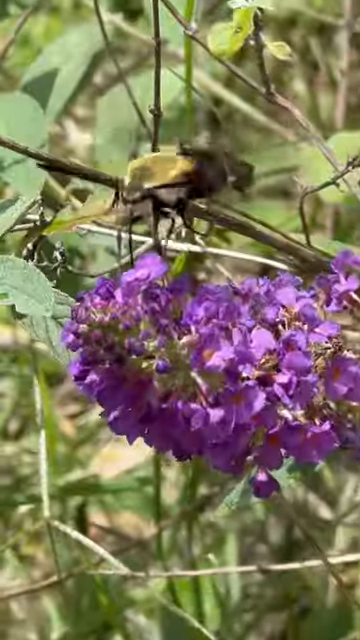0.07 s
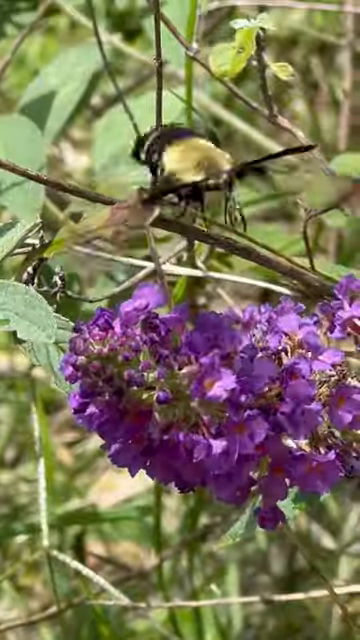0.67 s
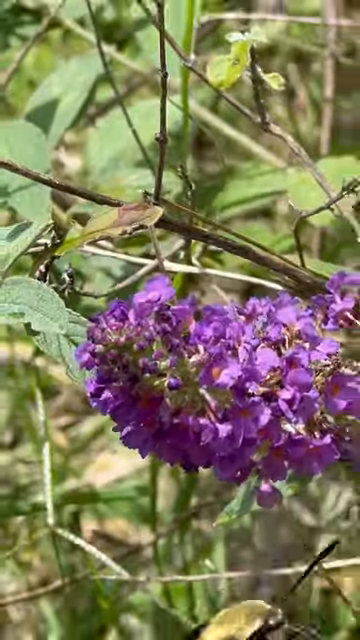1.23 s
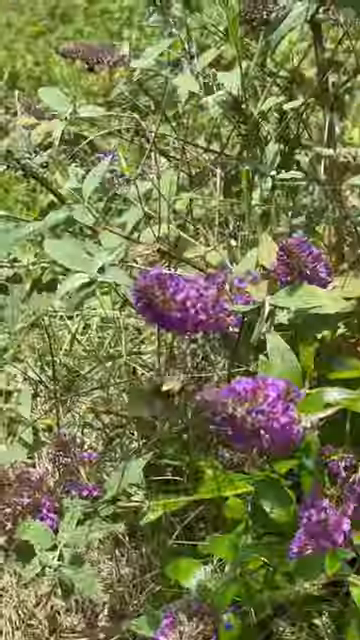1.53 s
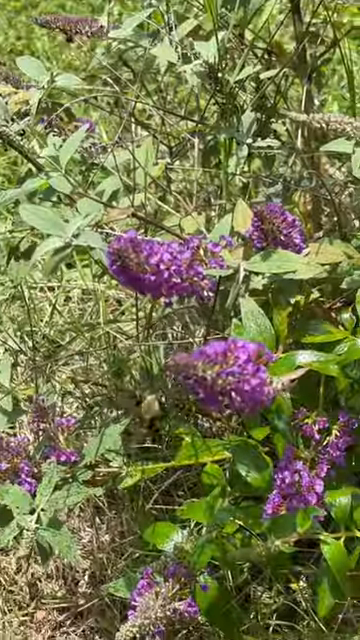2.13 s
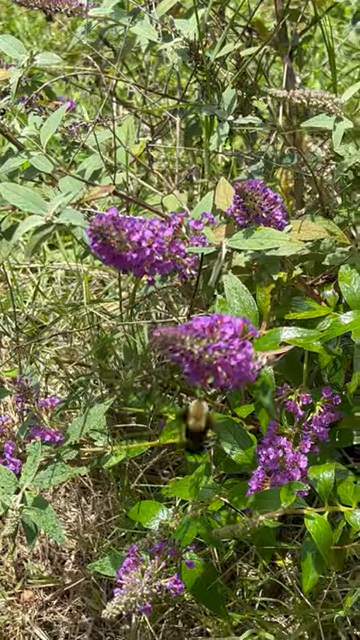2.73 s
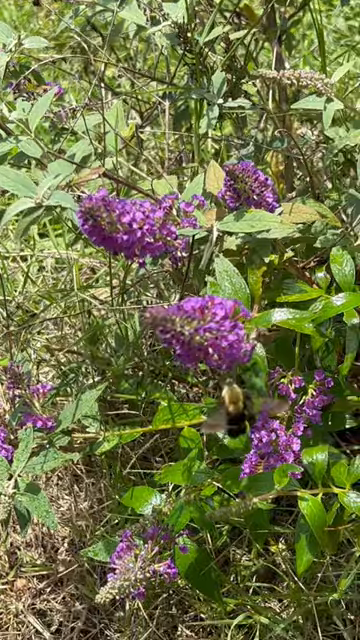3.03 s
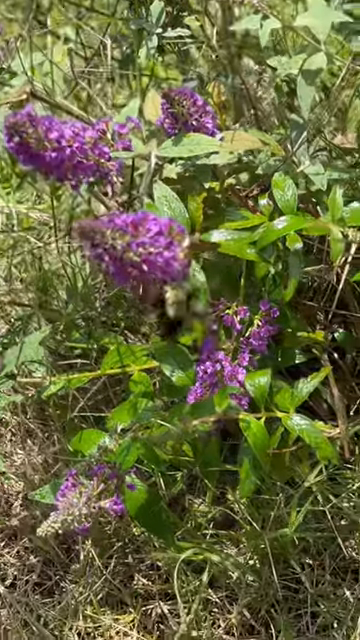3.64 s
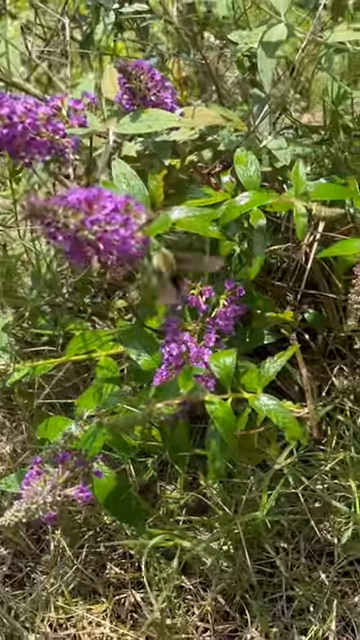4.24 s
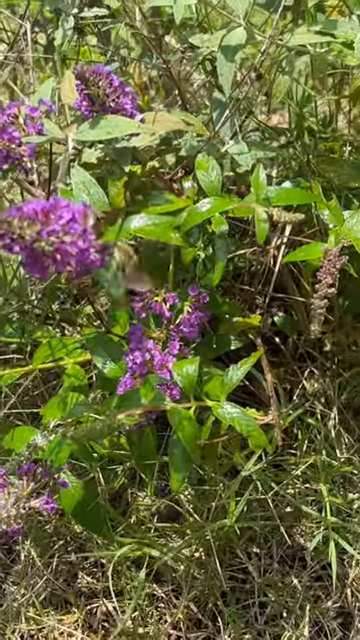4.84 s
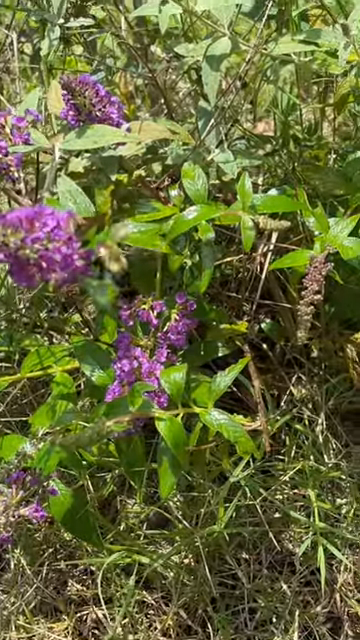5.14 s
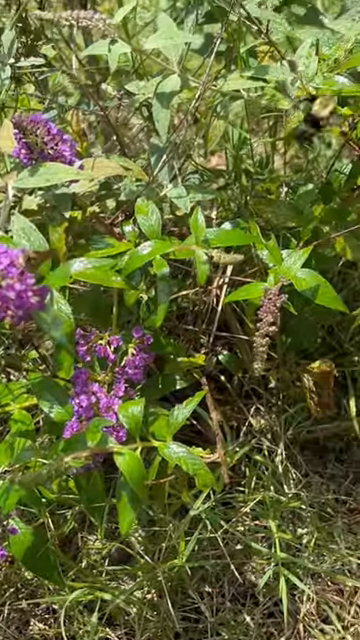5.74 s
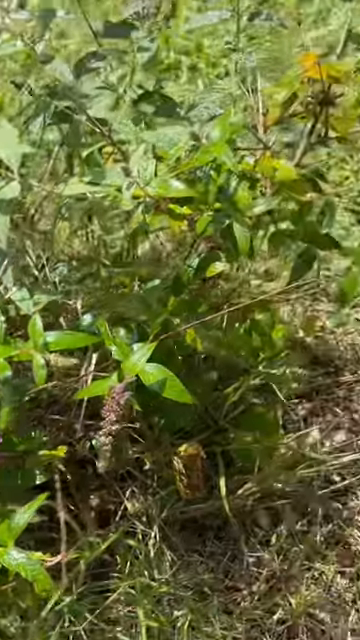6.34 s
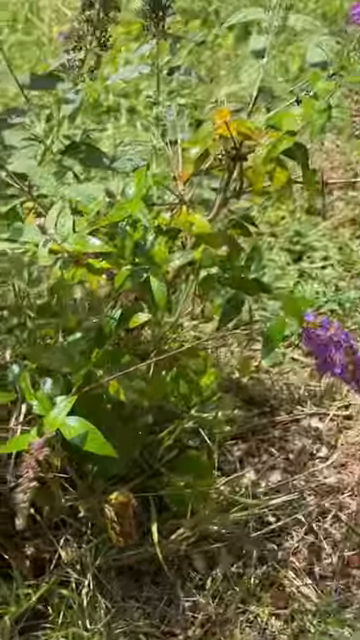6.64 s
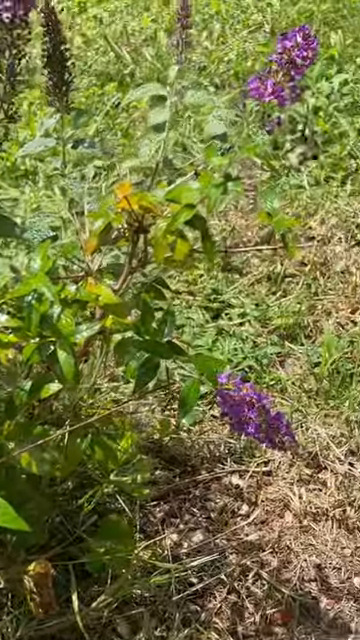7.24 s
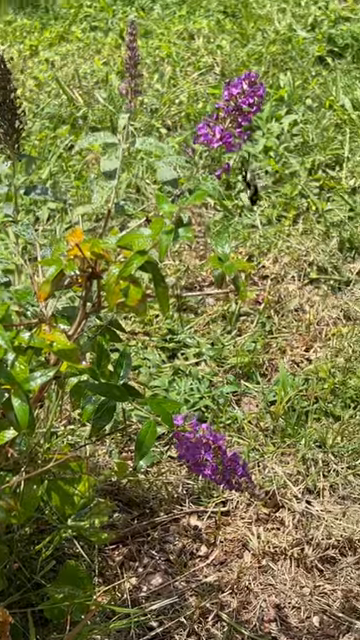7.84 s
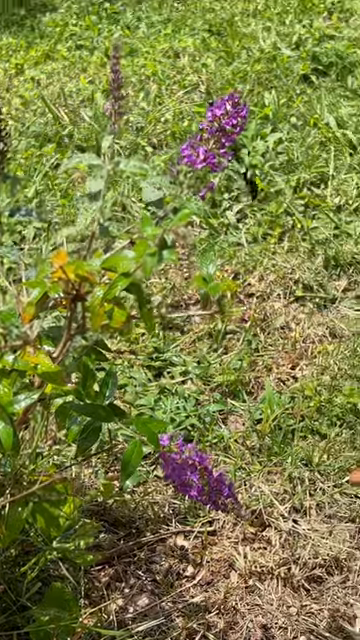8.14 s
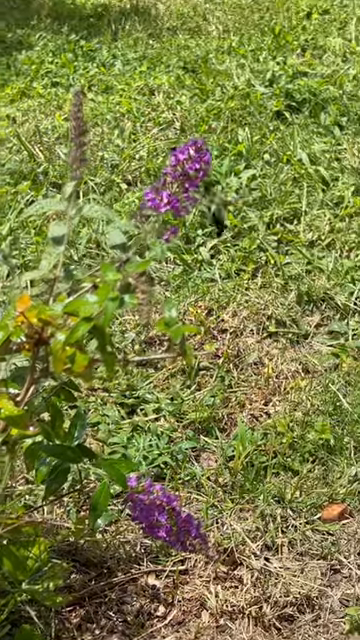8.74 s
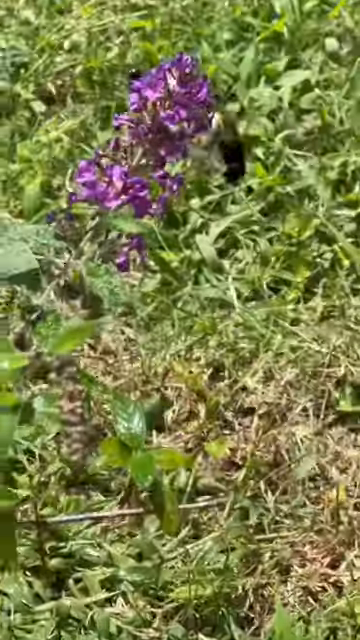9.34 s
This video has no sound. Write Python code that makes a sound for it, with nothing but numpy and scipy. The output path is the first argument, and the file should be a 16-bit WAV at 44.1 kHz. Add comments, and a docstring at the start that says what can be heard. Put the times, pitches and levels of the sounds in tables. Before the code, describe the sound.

A quiet outdoor garden ambience. From start to finish, one close cricket gives short, high, trilling chirps, three or four a second, slightly louder in the first 1.5 seconds. Two fainter crickets chirp out of step with it, one a little lower in pitch and one a little higher. Behind them is a steady, thin, high sizzle of insects. A low rumble of distant traffic continues throughout. A far mower drones at the start and gradually recedes, while a smoother distant engine comes up around 5 seconds and is strongest at about 6 to 7.5 seconds. Dry stalks give small, brief clicks around 1 second, at 1.7 seconds, twice near 3.5 seconds and once more sharply at 8 seconds. Leaves stir almost inaudibly. The chirping carries on to the end at about 9.5 seconds.

```python
"""A sunny garden. One cricket chirps close by and two answer from farther off; each chirp is a few
evenly spaced strokes of a scraper over a file, which set the wing ringing. Behind them a chorus of
meadow insects merges into a steady high sizzle. Two far engines, likely mowers, drone in harmonics
of their firing over a faint hum and the rumble and tyre wash of distant traffic. Puffs of air stir
the leaves, and a few dry stalks crack and ring with a tick."""
import sys
import numpy as np
from scipy import signal
from scipy.fft import rfft, irfft, next_fast_len
from scipy.io import wavfile
from scipy.ndimage import uniform_filter1d

SR = 44100
rng = np.random.default_rng(int(sys.argv[2]) if len(sys.argv) > 2 else 0)


def store_pcm(level_fs):
    """Save levels as 16-bit WAV."""
    pcm = np.round(np.clip(level_fs, -1, 1) * 32767).astype(np.int16)
    wavfile.write(sys.argv[1], SR, np.atleast_2d(pcm).T)


N = 418950
TIME = np.arange(N) / SR

# The stereo sound field. Each row: frequency in Hz, left-right coherence, left minus right in dB.
STEREO_FIELD = [(62, .9995, 0.5), (115, .998, 0.5), (177, 1, 2), (290, 0.97, 3.5), (496, 0.77, 2),
                (800, .62, 0), (1240, 0.63, -2.5), (1680, 1, -1), (4000, 0.98, 1), (8700, 0.99, 0)]


def from_db(db):
    """Amplitude ratio: a factor of ten for every 20 dB."""
    return 10 ** (np.asarray(db) / 20)


def unit_rms(x):
    """Normalisation to unit mean power."""
    return x / np.sqrt(np.mean(x ** 2) + 1e-20)


def in_time(rows):
    """Linear interpolation of each column over time."""
    times, *columns = np.transpose(rows)
    return [np.interp(TIME, times, column) for column in columns]


def at_hz(rows, hz):
    """Interpolation of each column on a logarithmic frequency axis."""
    frequencies, *columns = np.transpose(rows)
    return [np.interp(np.log(hz), np.log(frequencies), column) for column in columns]


def drift(rate_hz):
    """Slow random fluctuation: low-passed noise of unit rms."""
    step, run_in = 40, 2000
    pole = np.exp(-2 * np.pi * rate_hz * step / SR)
    white = rng.standard_normal(N // step + run_in + 2)
    slow = signal.lfilter([1], [1, -2 * pole, pole * pole], white)[run_in:]
    return np.interp(np.arange(N) / step, np.arange(len(slow)), unit_rms(slow))


def band(x, low_hz, high_hz, order=2):
    """Maximally flat band-pass filtering."""
    sections = signal.butter(order, [low_hz, min(high_hz, .45 * SR)], "band", fs=SR, output="sos")
    return signal.sosfilt(sections, x)


def pan(db):
    """Direction by level difference: gains that put left db above right."""
    return from_db(np.array([[db], [-db]]) / 2)


def banded_noise(spectrum, edges_hz, flicker_db):
    """Partly coherent stereo noise of unit rms; each band has its own level, flicker and width."""
    out, white = 0, rng.standard_normal((2, 2, N))
    for k, (low, high) in enumerate(zip(edges_hz, edges_hz[1:])):
        mid, side = band(white[k % 2], low, high, order=3)
        centre_hz = np.sqrt(low * high)
        coherence, lean_db = at_hz(STEREO_FIELD, centre_hz)
        gain = from_db(at_hz(spectrum, centre_hz)[0] + flicker_db * drift(21))
        pair = np.sqrt(1 + coherence) * mid + np.sqrt(1 - coherence) * side * [[1], [-1]]
        out = out + gain * pan(lean_db) * pair
    return unit_rms(out)


def traffic():
    """Broadband noise: distant vehicles add up to a low rumble and a soft wash of tyres."""
    # Spectra of rumble and wash. Each row: frequency in Hz, relative spectral density in dB.
    rumble_spectrum = [(20, -31.5), (32, -23), (45, -6), (70, 1), (120, 0), (170, 0.5), (225, -8),
                       (300, -10.5), (400, -20), (600, -36.5), (1000, -47.5)]
    wash_spectrum = [(300, 0.5), (450, -1.5), (550, -4), (660, -3.5), (900, 2.5), (1100, -2.5),
                     (1500, -8.5), (2000, -16), (2800, -24), (4000, -32.5), (5200, -41.5), (7000, -38)]
    # Each row: time in seconds, rumble level in dB, wash level in dB.
    levels = [(0, -50, -61.5), (2, -49, -62), (4.3, -52, -63), (6.3, -49, -62), (7.5, -50.5, -61),
              (9.5, -50.5, -60.5)]
    rumble_db, wash_db = in_time(levels)
    rumble = banded_noise(rumble_spectrum, np.geomspace(18, 1100, 16), flicker_db=1.0)
    wash = banded_noise(wash_spectrum, np.geomspace(280, 7000, 18), flicker_db=.6)
    return from_db(rumble_db) * rumble + from_db(wash_db) * wash


def hum():
    """Narrow-band noise is heard as a wavering pitch: a far hum that holds its level, then fades."""
    hold_s, fade_db_per_s = 2.85, 2.5
    level_db = -69.5 - fade_db_per_s * np.maximum(TIME - hold_s, 0)
    return from_db(level_db) * unit_rms(band(rng.standard_normal(N), 526.5, 554, order=1)) * pan(2.4)


def drone(cycle_hz, orders, levels, registers_hz, fading_db, flutter_db, throb_db, wobble_rad):
    """A modulated harmonic series: uneven firing makes all orders throb, moving air makes each waver."""
    out, cycles, register_db = 0, np.cumsum(cycle_hz) / SR, np.array(in_time(levels))
    for multiple, db in orders:
        hz = multiple * np.mean(cycle_hz)
        # An order follows the levels of the registers nearest to it.
        shares = np.array([np.interp(hz, registers_hz, own) for own in np.eye(len(registers_hz))])
        gain = from_db(db + shares @ register_db + fading_db * drift(1.18) + flutter_db * drift(9.4))
        phase = 2 * np.pi * (multiple * cycles + rng.random())
        phase += wobble_rad * np.sqrt(hz / registers_hz[0]) * drift(1.44)
        out = out + pan(at_hz(STEREO_FIELD, hz)[1]) * gain * np.sqrt(2) * np.sin(phase)
    return out * from_db(throb_db * drift(11))


def engines():
    """Periodic firing gives harmonics: a mower recedes, a smoother engine comes up halfway through."""
    # Harmonics of each engine. Each row: multiple of the fundamental, relative level in dB.
    mower_orders = [(2, -18.5), (3, -12), (4, -3), (5, 0), (6, -14), (7, 0), (8, 0), (9, -.5), (10, -14),
                    (11, -8.5), (12, -4.5), (13, -19), (15, -21), (18, -21.5)]
    engine_orders = [(1, -12), (2, 0), (3, -0.5), (4, -1), (5, -12.5)]
    # Each row: time in seconds, then gain in dB of the bass, middle and upper registers.
    mower_levels = [(0, -45.5, -47, -48), (.6, -46, -50.5, -49), (.76, -46.5, -52.5, -59),
                    (1.45, -47.5, -52, -55.5), (1.8, -51, -55, -57), (2.4, -54, -54.5, -62),
                    (2.85, -49.5, -53, -63), (3.15, -49.5, -55.5, -58), (3.65, -49.5, -45.5, -59),
                    (3.95, -53.5, -57, -59), (4.8, -53.5, -56.5, -63.5), (5.6, -52.5, -57.5, -64),
                    (6.5, -53.5, -55, -60), (7.301, -58.5, -64, -66), (8.3, -55, -60.5, -63.5),
                    (9.5, -62.5, -65, -65)]
    engine_levels = [(0, -77, -86, -86), (4.5, -64, -78.5, -84.5), (5.4, -56, -70, -77),
                     (5.9, -53, -63.5, -64.5), (6.17, -49.5, -56, -55), (6.5, -44.5, -58.5, -63.5),
                     (7.05, -49, -65.5, -66), (7.35, -45, -61.5, -64), (7.7, -51.5, -69.5, -67),
                     (8.1, -50, -68, -61), (8.6, -50.5, -66.5, -69.5), (9.1, -54, -64, -69.5),
                     (9.5, -49, -65.5, -69)]
    settle_s, sag_hz_per_s = 3.0, .67
    cycle_hz = 21.8 + .6 * np.exp(-TIME / settle_s)   # under load the mower slows to a steady speed
    firing_hz = 88.7 - sag_hz_per_s * TIME
    mower = drone(cycle_hz, mower_orders, mower_levels, registers_hz=(109, 152, 188),
                  fading_db=1.5, flutter_db=1.07, throb_db=1.04, wobble_rad=.44)
    engine = drone(firing_hz, engine_orders, engine_levels, registers_hz=(174, 253, 340),
                   fading_db=.84, flutter_db=1.85, throb_db=.9, wobble_rad=.32)
    return mower + engine


def leaves():
    """Incoherent sources add in power: each puff of air gives a bell-shaped swish with tiny crinkles."""
    # The swish. Each row: frequency in Hz, relative spectral density in dB.
    spectrum = [(1800, -3), (2900, 6), (4000, 5.5), (5000, -3.5), (6500, 1.5), (10000, -20), (12500, -22)]
    # Puffs of air. Each row: middle in seconds, half length in seconds, peak level in dB.
    puffs = [(0.103, 0.26, -86.5), (2.798, .2, -83.5), (3.21, 0.071, -79), (4.215, 1, -86),
             (5.84, .15, -82.5), (6.847, 0.29, -84), (7.703, .25, -82.5), (9.1, 0.54, -86.5)]
    rest_db, crinkle_db, catches_per_s = -90.5, -11, 120
    power = from_db(rest_db) ** 2 + sum(from_db(db) ** 2 * np.exp(-((TIME - middle) / half) ** 2)
                                        for middle, half, db in puffs)
    stir = np.sqrt(power / power.mean())   # leaf edges catch more often in a puff
    catches = (rng.random(N) < catches_per_s * stir / SR) * rng.standard_normal(N)
    crinkles = from_db(crinkle_db) * unit_rms(band(catches, 2200, 7500))
    swish = banded_noise(spectrum, np.geomspace(1800, 12500, 10), flicker_db=3.0)
    return np.sqrt(power) * (swish + crinkles)


def stalk_ticks():
    """Damped modes: a stalk gives way with a crack and rings; thick stalks ring lower and longer."""
    # Each row: start in seconds, gain in dB, pitch factor, contact time in seconds,
    # relative level of the crack in dB, upper edge of the crack in Hz.
    ticks = [(0.987, -47.5, 0.84, 0.00034, -25, 8900), (1.012, -48, 0.59, 0.00066, -38, 8000),
             (1.172, -52, 1.1, .0003, -10, 9000), (1.722, -41.5, 0.65, 0.00068, -42, 8050),
             (3.4218, -40.5, 0.79, 0.00071, -38, 8000), (3.481, -42.5, .98, 0.00012, -4, 8900),
             (7.234, -58, 1.4, .00012, -13, 8900), (8.0432, -38.5, 0.97, 0.00019, -4, 9200)]
    # Modes at pitch factor 1. Each row: frequency in Hz, relative level in dB, 60 dB decay in seconds.
    modes = [(370, -6, 0.029), (1023, -0.5, 0.015), (1295, 1, 0.0093), (1560, -2.5, 0.015),
             (2110, -12, 0.007), (3330, -14.5, 0.0075), (4720, -12, 0.0056)]
    out, t = np.zeros(N), TIME[:SR // 20]
    for start, db, pitch, contact_s, crack_db, top_hz in ticks:
        # Alternating signs make the ring swell over a cycle or two.
        ring = sum((-1) ** k * from_db(mode_db - 60 * t * pitch / t60)
                   * np.sin(2 * np.pi * hz * pitch * t) for k, (hz, mode_db, t60) in enumerate(modes))
        push = np.sin(np.pi * np.minimum(t / contact_s, 1)) ** 2   # a longer contact dulls the ring
        ring = band(signal.fftconvolve(ring, push / push.sum())[:len(t)], 280, 7000)
        crack = band(rng.standard_normal(len(t)) * from_db(-60 * t / .0068), 6200, top_hz)
        at = int(start * SR)
        out[at:at + len(t)] += from_db(db) * (ring + from_db(crack_db) * crack / np.abs(crack).max())
    return out


def insect_chorus():
    """Incoherent summation: countless small meadow insects merge into a narrow band of sizzle."""
    # Each row: frequency in Hz, relative spectral density in dB.
    spectrum = [(5400, -28.5), (5900, -24.5), (6300, -12), (6700, -6.5), (6950, -2), (7250, 1),
                (7500, -0.5), (7850, 0), (8100, -4.5), (8400, -15), (8900, -21), (9400, -42.5),
                (11000, -51.5), (15000, -59.5)]
    # Each row: time in seconds, level in dB.
    levels = [(0, -61), (.8, -61), (9.5, -60)]
    level_db, = in_time(levels)
    edges_hz = np.r_[np.geomspace(5300, 9600, 17), 11000, 13000, 15700]
    return from_db(level_db) * banded_noise(spectrum, edges_hz, flicker_db=.8)


def foliage_echoes(x, wet_db, t60):
    """Scattering: leaves and ground add many faint, quickly dying echoes to the direct sound."""
    t = TIME[:SR // 4]
    echoes = rng.standard_normal((3, len(t))) * from_db(-60 * t / t60) * (t > .008)
    echoes = echoes[0] + .13 * echoes[1:]   # nearly alike in left and right
    echoes /= np.sqrt(np.sum(echoes ** 2, axis=1, keepdims=True))
    return x + from_db(wet_db) * signal.fftconvolve(x[None], echoes, axes=1)[:, :N]


def chirp(t, count, stroke, period_s, pitch_hz, first_db, rough_hz, rise_hz=0):
    """Stridulation: each stroke rings the wing as a near sine whose pitch sags as the scraper slows."""
    out, (times, amplitudes, offsets_hz) = np.zeros(len(t)), np.transpose(stroke)
    edge_s, growth = .002, .035   # the wing's start and stop; each stroke lasts a little longer
    envelope_times = np.r_[times[0] - edge_s, times, times[-1] + edge_s]
    for k in range(count):
        stroke_t = (t - k * period_s + rng.normal(0, .00031)) / (1 + growth * k)
        envelope = np.interp(stroke_t, envelope_times, np.r_[0, amplitudes, 0])
        teeth = unit_rms(uniform_filter1d(rng.standard_normal(len(t)), size=50))
        hz = pitch_hz + rise_hz * k + np.interp(stroke_t, times, offsets_hz) + rng.normal(0, 8)
        hz += rough_hz * teeth   # the file catches unevenly
        gain = from_db(first_db * (k == 0) + rng.normal(0, .45))
        out += gain * envelope * np.sin(2 * np.pi * (np.cumsum(hz) / SR + rng.random()))
    return out


def cricket(chirps, stroke, **voice):
    """Pulse trains: each chirp is a few evenly spaced wing strokes, the first one softer."""
    out = np.zeros(N)
    for start, count, db in chirps:
        span = slice(max(0, int((start - .02) * SR)), int((start + .2) * SR))
        out[span] += from_db(db) * chirp(TIME[span] - start, count, stroke, **voice)
    return out


def crickets():
    """Direct-to-reverberant ratio: of three crickets, each on its own pitch, the farther blur more."""
    # One closing stroke of the wings. Each row: time from its middle in seconds, relative amplitude,
    # pitch offset in Hz.
    clean_stroke = [(-.0085, .55, -10.5), (-.004, 0.77, 13), (.001, 1.0, -2.5), (.0042, 0.85, -34.5),
                    (.0056, .16, -150), (.0085, 0.046, -400)]
    slurred_stroke = [(-.008, .7, 25), (-.003, 1.0, 8), (.003, .95, -15), (.0065, 0.54, -110),
                      (.01, .4, -330)]
    # Chirps of the near, the lower-pitched and the higher-pitched cricket.
    # Each row: time of the first stroke in seconds, number of strokes, relative level in dB.
    near_chirps = [(0.044, 6, -48.5), (0.34, 6, -48.0), (0.648, 5, -49.0), (0.911, 5, -48.0),
                   (1.168, 5, -48.5), (1.423, 5, -49.5), (1.685, 6, -52.0), (1.973, 6, -52.5),
                   (2.264, 6, -53), (2.562, 6, -52.5), (2.85, 6, -51.5), (3.15, 6, -49.0),
                   (3.446, 6, -55.5), (3.766, 6, -53.5), (4.062, 5, -51), (4.322, 5, -50.5),
                   (4.573, 5, -50.5), (4.838, 6, -50.5), (5.123, 6, -50.5), (5.419, 5, -51.0),
                   (5.715, 6, -51), (6.003, 6, -51.5), (6.3, 6, -51.0), (6.595, 6, -52.5),
                   (6.879, 6, -53.5), (7.18, 5, -55), (7.438, 5, -54.0), (7.717, 6, -54.5),
                   (8.011, 5, -54.5), (8.263, 5, -54), (8.52, 6, -52.5), (8.796, 6, -52), (9.08, 6, -50),
                   (9.364, 6, -50)]
    low_chirps = [(0.104, 5, -64.0), (0.474, 5, -66), (0.841, 5, -65.0), (1.176, 5, -63), (1.537, 5, -64),
                  (2.008, 5, -64), (2.306, 5, -63), (2.623, 5, -62), (2.972, 5, -61.5), (3.48, 5, -59),
                  (3.801, 5, -59), (4.214, 5, -62.5), (4.555, 5, -66), (4.899, 5, -68.0), (5.219, 5, -65),
                  (5.539, 5, -62.5), (6.071, 5, -61), (6.453, 5, -63), (6.925, 5, -61), (7.26, 5, -62.5),
                  (7.622, 5, -64), (7.927, 5, -63), (8.228, 5, -61.5), (8.589, 5, -58), (9.062, 5, -64)]
    high_chirps = [(.14, 4, -59), (.553, 4, -57), (.85, 4, -58), (1.18, 4, -59), (1.46, 4, -60),
                   (1.75, 4, -60), (2.02, 4, -58), (2.3, 4, -61), (2.59, 4, -59), (2.93, 4, -61),
                   (3.23, 4, -58), (3.56, 4, -61), (3.95, 4, -59), (4.235, 4, -58), (4.51, 4, -60),
                   (4.83, 4, -63), (5.13, 4, -64), (5.5, 4, -62), (5.76, 4, -66), (6.07, 4, -57),
                   (6.38, 4, -58), (6.66, 4, -64), (7.2, 4, -59), (7.52, 4, -63), (7.8, 4, -63),
                   (8.15, 4, -70), (8.5, 4, -59), (8.76, 4, -65), (9.04, 4, -62)]
    near = cricket(near_chirps, clean_stroke, period_s=.0262, pitch_hz=6457, first_db=-2, rough_hz=30)
    low = cricket(low_chirps, slurred_stroke, period_s=.0262, pitch_hz=6270, first_db=-.5, rough_hz=30)
    high = cricket(high_chirps, clean_stroke, period_s=.026, pitch_hz=6700, first_db=-1.5, rough_hz=25,
                   rise_hz=16)
    return (from_db(1.5) * foliage_echoes(near, wet_db=-14.5, t60=.23)
            + from_db(.8) * foliage_echoes(low, wet_db=-10, t60=.12)
            + from_db(1.0) * foliage_echoes(high, wet_db=-5, t60=.11))


def scene():
    """Superposition: insects in front, engines and traffic far behind."""
    return crickets() + insect_chorus() + leaves() + stalk_ticks() + engines() + hum() + traffic()


def record(dry):
    """Phase difference: two microphone ports hear out of step; faint hiss and a steep low-pass follow."""
    # Each row: frequency in Hz, phase by which left leads right in radians.
    port_phase = [(100, 0), (260, -0.14), (520, -1.1), (860, -0.56), (1460, 0.72), (2500, 0.3), (6500, 0),
                  (7400, -0.043), (7800, -0.88), (8500, -0.78), (9500, -0.43)]
    cutoff_hz, size = 15700, next_fast_len(N + SR // 10)
    bin_hz = np.arange(size // 2 + 1) * SR / size
    lead, = at_hz(port_phase, np.maximum(bin_hz, 1))
    heard = irfft(rfft(dry, size) * np.exp(.5j * lead * [[1], [-1]]), size)[:, :N]
    hiss = from_db(-82.5) * unit_rms(band(rng.standard_normal(N), 12500, 17000)) * [[1], [-1]]
    return signal.sosfilt(signal.ellip(10, .1, 80, cutoff_hz, fs=SR, output="sos"), heard + hiss)


dry = scene()
out = record(dry)
store_pcm(out)
```